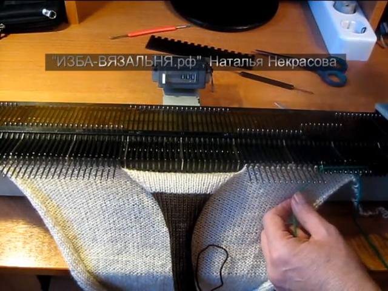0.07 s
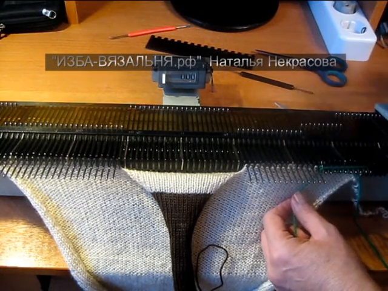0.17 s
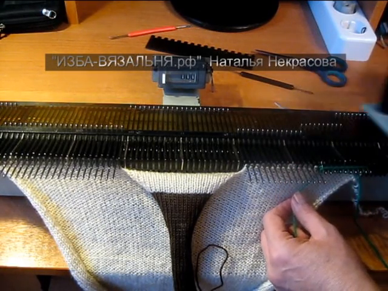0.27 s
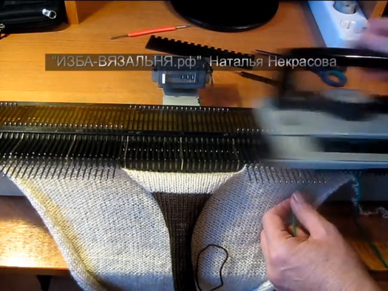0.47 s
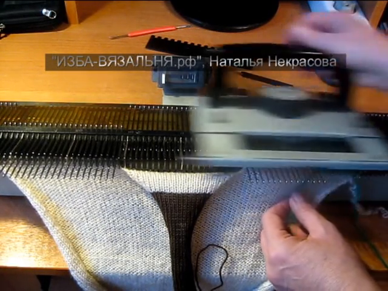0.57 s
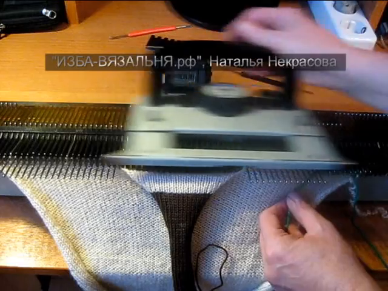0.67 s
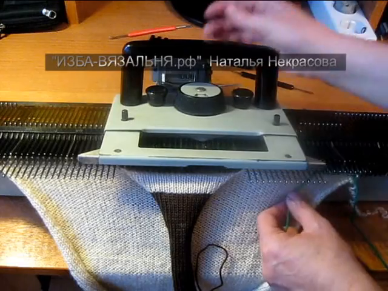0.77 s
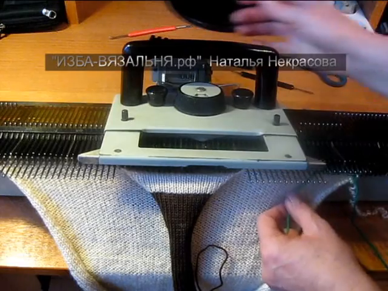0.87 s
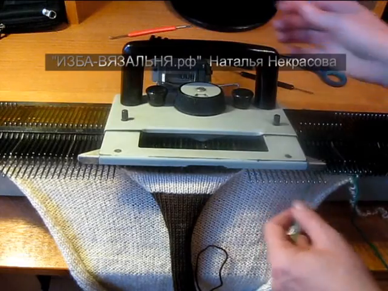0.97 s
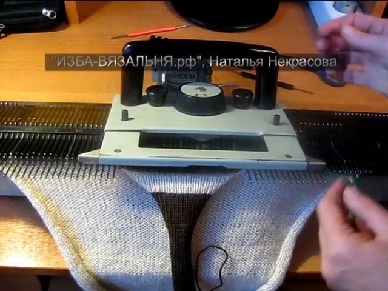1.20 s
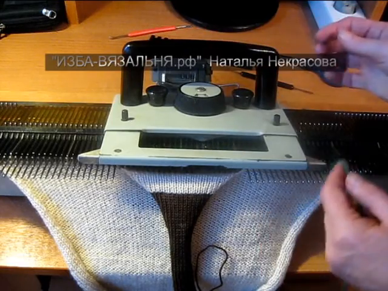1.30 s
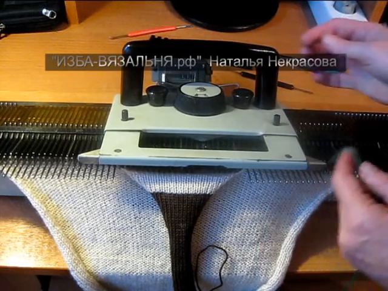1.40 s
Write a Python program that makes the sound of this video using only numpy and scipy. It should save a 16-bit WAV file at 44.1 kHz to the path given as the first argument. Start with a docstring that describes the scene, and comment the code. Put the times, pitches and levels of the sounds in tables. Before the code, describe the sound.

In a small room, a knitting machine carriage clacks into steel needles and slides across them with a fast, rasping rattle. It coasts to a gentle stop, and a hand faintly brushes the knitting.

```python
"""A hand softly touches a knitting machine in a small room; then the carriage is pushed once along
the steel needle bed. It knocks into the first needles and ticks over the rest, faster and then slower,
each impact a brief burst of vibration. Friction makes the cams rasp and drives the resonances of the
bed. The carriage coasts on its rail and stops with a soft knock; hands touch machine and knitting."""
import sys
import numpy as np
from scipy import signal
from scipy.fft import rfft, irfft, next_fast_len
from scipy.io import wavfile
from scipy.ndimage import uniform_filter1d

SR = 44100
rng = np.random.default_rng(int(sys.argv[2]) if len(sys.argv) > 2 else 0)


def wrap_up_sound(samples):
    """Save the sound to the file named by the first command line argument, as 16-bit audio."""
    columns = np.atleast_2d(samples).T
    # keep every value between -1 and 1, then stretch to whole-number steps
    tamed = np.clip(columns, -1, 1)
    steps = np.round(tamed * 32767).astype(np.int16)
    wavfile.write(sys.argv[1], SR, steps)


N = 63945
TIME = np.arange(N) / SR

def amp(db):
    """Decibels to amplitude ratio."""
    return 10 ** (np.asarray(db) / 20)

def unit(x):
    """Normalisation to rms 1."""
    return x / np.sqrt(np.mean(x ** 2) + 1e-20)

def noise():
    """Gaussian white noise."""
    return rng.standard_normal(N)

def curves(rows):
    """Linear interpolation in time of each column after the first."""
    times, *columns = np.transpose(rows)
    return [np.interp(TIME, times, column) for column in columns]

def filtered(x, response):
    """Linear filtering: the spectrum times a frequency response."""
    size = next_fast_len(N + SR // 2)
    return irfft(rfft(x, size) * response(np.fft.rfftfreq(size, 1 / SR)), size)[:N]

def colour(x, spectrum, resonances=()):
    """Minimum-phase filter of unit power: a broad spectrum plus resonance peaks."""
    def response(f):
        hz, db = np.transpose(spectrum)
        power = amp(np.interp(np.log(f + 1), np.log(hz), db)) ** 2
        for centre, width, level in resonances:
            taper = np.exp(-20 * (2 * (f - centre) / centre) ** 4)
            power += amp(level) ** 2 / (1 + (2 * (f - centre) / width) ** 2) * taper
        cepstrum = irfft(np.log(unit(np.sqrt(power)) + 1e-6))
        half = len(cepstrum) // 2
        return np.exp(rfft(np.r_[cepstrum[0], 2 * cepstrum[1:half], np.zeros(half)]))
    return filtered(x, response)

def bursts(times, db, decay_s):
    """Impulsive excitation: each impact adds noise energy that decays exponentially."""
    samples = np.clip(np.asarray(times) * SR, 0, N - 1).astype(int)
    kicks = np.bincount(samples, amp(db) ** 2, N)
    energy = signal.lfilter([1], [1, -np.exp(-2 / (decay_s * SR))], kicks)
    return noise() * np.sqrt(energy)

def ring(start, modes, rise_s):
    """Free vibration: damped modes struck at one moment."""
    t = np.maximum(TIME - start, 0)
    vibration = sum(amp(db - 60 * t / t60) * np.sin(2 * np.pi * hz * t) for hz, db, t60 in modes)
    return (1 - np.exp(-t / rise_s)) * vibration

def narrow(hz, width_hz):
    """Random excitation of a steady or moving resonance, rms 1."""
    phase = 2 * np.pi * np.cumsum(hz * np.ones(N)) / SR
    slow = lambda: filtered(noise(), lambda f: 1 / (1 + (f / width_hz) ** 2))
    return unit(slow() * np.cos(phase) + slow() * np.sin(phase))

def friction(grains_per_s=1300):
    """Sliding friction of steel on steel: dense random micro-impacts, rms 1."""
    times = TIME[rng.random(N) < grains_per_s / SR]
    grain_db = rng.standard_normal(len(times))
    return unit(bursts(times, grain_db, decay_s=0.00068))

# background spectrum (frequency [Hz], level [dB])
HISS_SPECTRUM = [(15, -54), (25, -9.5), (133, -5), (188, -6), (359, -4), (537, -7), (1020, -9.5),
                 (1240, -11), (5730, -21), (7910, -21), (15500, -24.5)]
def hiss():
    """Stationary noise, strongest in the bass."""
    return amp(-55.5) * colour(noise(), HISS_SPECTRUM)

def room(x, low_t60=0.35, high_t60=0.13, split_hz=4100):
    """Reverberation of a furnished room: the treble decays sooner."""
    low = filtered(noise(), lambda f: 1 / np.hypot(1, (f / split_hz) ** 2))
    high = filtered(noise(), lambda f: f ** 2 / np.hypot(split_hz ** 2, f ** 2))
    tail = (low * amp(-60 * TIME / low_t60) + high * amp(-60 * TIME / high_t60)) * (TIME > .003)
    return signal.fftconvolve(x, tail / np.linalg.norm(tail))[:N]

# bumps (time [s], level [dB])
TABLE_BUMPS = [(.002, -48), (.245, -44.5), (.265, -44), (0.306, -52), (1.154, -52.5), (1.425, -47)]
def table_bumps():
    """Structure-borne sound: dull bumps pass through the table."""
    impacts = bursts(*np.transpose(TABLE_BUMPS), decay_s=0.019)
    return colour(impacts, [(30, -8), (95, 0), (190, -2), (600, -20), (3000, -60)])

# brushing hand (time [s], level [dB])
RUSTLE_LEVELS = [(1.3, -86), (1.385, -62.5), (1.42, -51.5), (1.44, -46), (1.45, -48)]
# light rubbing (frequency [Hz], level [dB])
RUB_SPECTRUM = [(200, -35), (900, -14.5), (2300, -7), (3200, -8), (4300, -7), (6000, -19), (16000, -23)]
# brushed needles (frequency [Hz], bandwidth [Hz], level [dB])
BRUSH_PEAKS = [(2830, 73, 2), (3050, 100, 5.5), (3330, 90, -5), (3610, 100, 4)]
def rustle():
    """Friction noise: a hand brushes the knitting and the needles."""
    level_db, = curves(RUSTLE_LEVELS)
    return colour(amp(level_db) * noise(), RUB_SPECTRUM, BRUSH_PEAKS)

# swells (time [s], half length [s], frequency [Hz], level [dB])
BED_DRONES = [(0.583, 0.063, 298, -51.5), (0.767, 0.028, 310, -57), (0.815, 0.095, 130.8, -53)]
def bed_drone():
    """Narrow resonances: the bed drones briefly under the carriage."""
    return sum(amp(db) * np.exp(-((TIME - centre) / half) ** 2) * narrow(hz, width_hz=7.4)
               for centre, half, hz, db in BED_DRONES)

# carriage stroke (time [s], sliding level [dB], rasp level [dB], tick level [dB])
STROKE_LEVELS = [(.205, -88, -60, -69), (.245, -32.5, -54, -40), (.278, -31, -43, -30),
                 (.303, -24.5, -48, -8), (.325, -23, -27.5, -16.5), (.365, -28.5, -27.5, -14.5),
                 (.43, -32.5, -27.5, -16.5), (.485, -32.5, -24, -19.5), (.59, -30, -26, -20.5),
                 (.66, -33.5, -25, -20), (.73, -27.5, -26, -18), (.775, -33.5, -37.5, -34),
                 (.81, -36, -40, -53), (.85, -33.5, -44, -52), (.89, -44, -59, -55), (.94, -52.5, -77, -87),
                 (1.0, -62.5, -85, -94)]
# broad response of the machine (frequency [Hz], level [dB])
BODY_SPECTRUM = [(25, -65), (100, -37), (200, -44), (400, -27), (560, -15.5), (750, 1.5), (1050, -2),
                 (2200, -4), (3200, -2), (5500, -4), (9000, -12), (16000, -33)]
# resonances of bed and carriage (frequency [Hz], bandwidth [Hz], level [dB])
BED_PEAKS = [(283, 7, -9.5), (471.6, 46, -7), (626, 17, 2.5), (749, 25, 3), (870, 130, -0.5), (1200, 70, 2),
             (1377, 44, 1), (1625, 67, 0.5), (1894, 62, 2.5), (2126, 23, 5)]
def rail_slide():
    """Forced vibration: friction on the rail drives the bed."""
    slide_db, _, _ = curves(STROKE_LEVELS)
    return colour(amp(slide_db) * friction(), BODY_SPECTRUM, BED_PEAKS)

# soft contacts (time [s], ring level [dB], tick level [dB])
SOFT_TOUCHES = [(.002, -53, -38.5), (.971, -36, -49), (1.155, -52, -73.5), (1.237, -62, -53.5),
                (1.325, -58.5, -64)]
# machine modes (frequency [Hz], level [dB], T60 [s])
BODY_MODES = [(540, -5, 0.049), (660, -2, 0.03), (1190, -17, 0.042)]
def touches():
    """Modal ringing: each soft contact ticks and sets the machine vibrating."""
    times, ring_db, tick_db = np.transpose(SOFT_TOUCHES)
    rings = sum(amp(db) * ring(start, BODY_MODES, rise_s=0.00034) for start, db in zip(times, ring_db))
    return rings + colour(bursts(times, tick_db, decay_s=0.0065), BODY_SPECTRUM)

# dull contact (frequency [Hz], level [dB])
DULL_SPECTRUM = [(60, -42), (200, -9.5), (400, -6), (800, -12), (1600, -16), (2600, -26), (4000, -16),
                 (6500, -27), (16000, -40)]
def settling(db_per_s=380):
    """Free decay: the machine still rings from an earlier touch."""
    return colour(amp(-47 - db_per_s * TIME) * noise(), DULL_SPECTRUM, BED_PEAKS)

# cam contact resonances (frequency [Hz], bandwidth [Hz], level [dB])
CAM_PEAKS = [(880, 94, 7.5), (1580, 140, 4.5), (2503, 120, 5.5)]
def cam_contact(peak_s=.2258, fall_s=.0075):
    """Friction, then impact: a short scrape leads into the first dull touch of the cams."""
    t = TIME - peak_s
    swell = lambda rise_s: np.exp(-np.abs(t) / np.where(t < 0, rise_s, fall_s))
    contact = colour(amp(-24) * swell(rise_s=.002) * noise(), DULL_SPECTRUM, CAM_PEAKS)
    scrape = colour(amp(-40) * swell(rise_s=.0066) * noise(), RUB_SPECTRUM)
    return scrape + contact

# sinking resonance (time [s], frequency [Hz], level [dB])
GLIDE_PATH = [(.27, 3463, -78), (.325, 3329, -26.5), (.41, 3011, -28.5), (.465, 2915, -28),
              (.505, 2804, -31), (.55, 2768, -45), (.65, 2250, -34.5), (.73, 2170, -49), (.79, 2130, -75),
              (.9, 2100, -120)]
def sinking_resonance(ticks, roughness=0.23):
    """Amplitude modulation: the ticks excite a resonance that sinks as the carriage travels."""
    hz, db = curves(GLIDE_PATH)
    power = lambda samples: np.abs(uniform_filter1d(ticks ** 2, samples)) + 1e-8
    chatter = (power(130) / power(1300)) ** roughness
    return amp(db) * chatter * narrow(hz, width_hz=140) * (TIME > FIRST_KNOCKS[0][0])

# rubbing cams (frequency [Hz], level [dB])
RASP_SPECTRUM = [(40, -57), (350, -49), (600, -25), (1100, -3.5), (2200, 4), (3800, -0.5), (6000, 0),
                 (9000, -7), (13000, -2.5), (16000, -16)]
def cam_rasp():
    """Sliding friction: the cams give a bright, grainy noise."""
    _, rasp_db, _ = curves(STROKE_LEVELS)
    return colour(amp(rasp_db) * friction(), RASP_SPECTRUM)

# steel impact (frequency [Hz], level [dB])
CLICK_SPECTRUM = [(40, -59), (350, -35), (650, -28), (1200, -4.5), (3000, 0), (4200, -2), (6000, 1),
                  (9000, -2), (13000, -2.5), (16000, -9)]
def clicks(times, db):
    """Hard impact of steel on steel: a broadband crack and a short after-ring."""
    crack = bursts(times, db, decay_s=.0012)
    after_ring = bursts(times, db - 15.5, decay_s=.0045)
    return colour(crack + after_ring, CLICK_SPECTRUM)

# knocks (time [s], thud level [dB], click level [dB], ping level [dB])
FIRST_KNOCKS = [(0.2421, -21.5, -18.5, -29.5), (0.2529, -18.5, -18, -17.5), (0.2848, -16, -15.5, -45),
                (0.2911, -30, -14.5, -44), (0.3038, -18.5, -23, -50), (.3095, -26.5, -10, -52),
                (0.3177, -34, -13, -48)]
# struck needle (frequency [Hz], level [dB], T60 [s])
NEEDLE_MODES = [(4430, 6, 0.018), (4670, 2, 0.017)]
def knocks():
    """Impact excitation: the cams hit the first needles; the bed thuds, steel clicks and pings."""
    times, thud_db, click_db, ping_db = np.transpose(FIRST_KNOCKS)
    thuds = colour(bursts(times, thud_db, decay_s=0.0075), BODY_SPECTRUM, BED_PEAKS)
    pings = sum(amp(db) * ring(start, NEEDLE_MODES, rise_s=0.00013) for start, db in zip(times, ping_db))
    return thuds + clicks(times, click_db) + pings

# needles met by the cams (time [s], rate [1/s])
NEEDLE_RATE = [(.3233, 82), (.363, 101), (.40, 121), (.45, 143), (.51, 163), (.57, 160), (.65, 130),
               (.72, 118), (.79, 70)]
def needles(climb_s=0.0014, latch_s=0.0017, scatter_db=1.6):
    """An impact train: each needle scrapes up the cam, snaps over it and flips its latch."""
    rate, = curves(NEEDLE_RATE)
    start, first_rate = NEEDLE_RATE[0]
    passed = np.cumsum(rate * (TIME > start)) / SR
    samples = np.flatnonzero(np.diff(np.ceil(passed)))
    _, _, tick_db = curves(STROKE_LEVELS)
    times, db = TIME[samples], tick_db[samples]
    snap_jitter, latch_jitter, snap_size, latch_size = rng.standard_normal((len(times), 4)).T
    spread_s = .00015 * (rate[samples] / first_rate) ** 2.6  # faster travel, less even snaps
    snaps = times + spread_s * snap_jitter
    flips = snaps + latch_s * (1 + 0.37 * latch_jitter)
    levels = np.r_[db - 3, db + scatter_db * snap_size, db - 2 + scatter_db * latch_size]
    return clicks(np.r_[times - climb_s, snaps, flips], levels)

def scene():
    """Superposition of the machine, its reverberation and the hiss."""
    ticks = needles()
    impacts = cam_contact() + knocks() + ticks
    carriage = rail_slide() + cam_rasp() + sinking_resonance(ticks) + bed_drone()
    handling = touches() + table_bumps() + settling() + rustle()
    machine = impacts + carriage + handling
    return (machine + amp(-13) * room(machine) + hiss())[None]

def record(dry, notch_hz=7875, width_hz=1060, top_hz=15950):
    """Band-stop and low-pass filtering: the recorder has a deep treble notch and a steep band limit."""
    notch = lambda f: np.abs(f - notch_hz) / np.hypot(f - notch_hz, width_hz)
    return filtered(dry[0], lambda f: notch(f) * (f < top_hz))[None]

dry = scene()
out = record(dry)
wrap_up_sound(out)
```